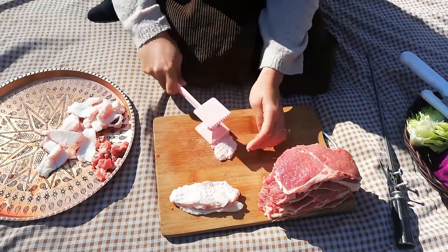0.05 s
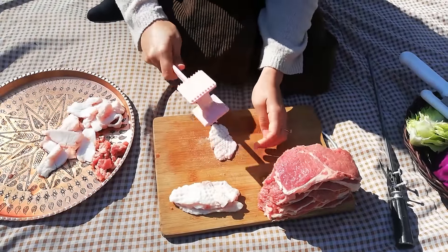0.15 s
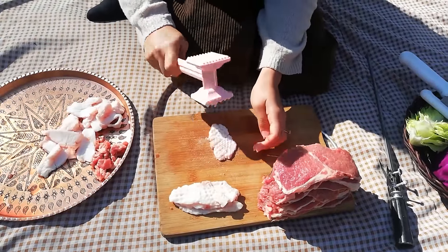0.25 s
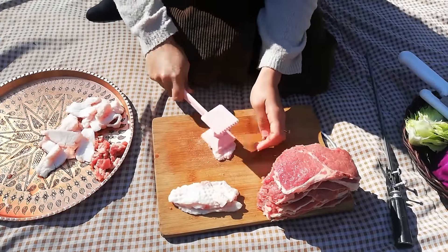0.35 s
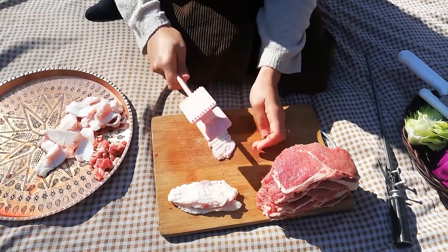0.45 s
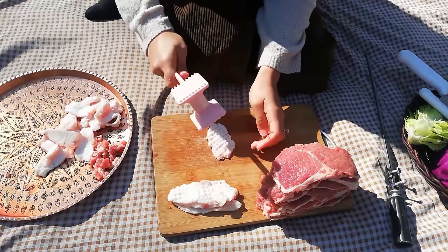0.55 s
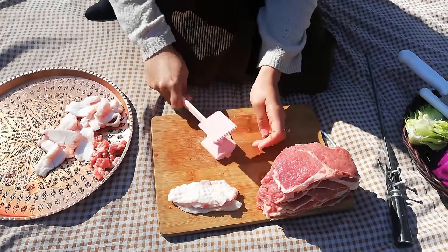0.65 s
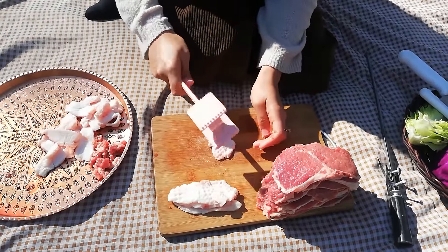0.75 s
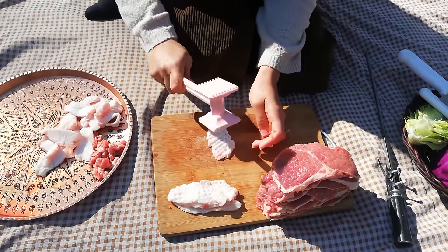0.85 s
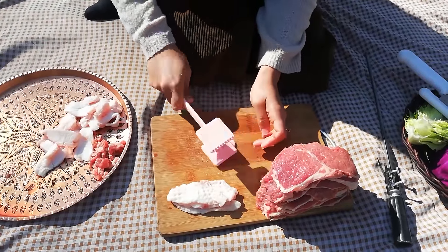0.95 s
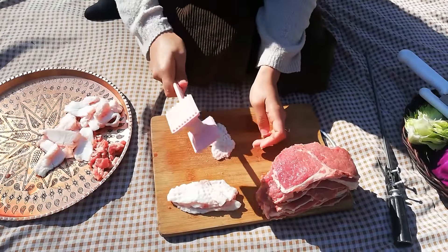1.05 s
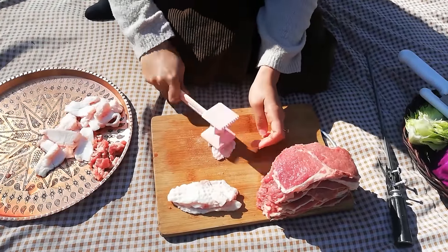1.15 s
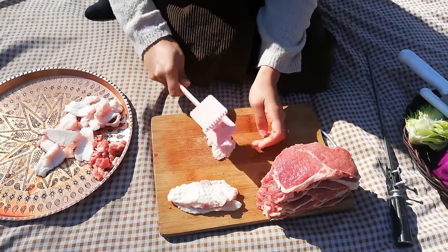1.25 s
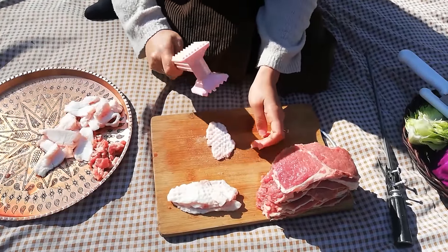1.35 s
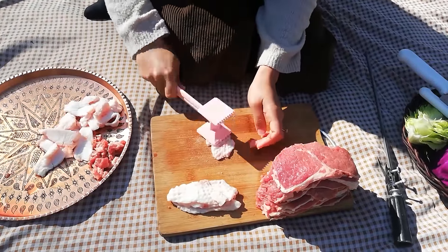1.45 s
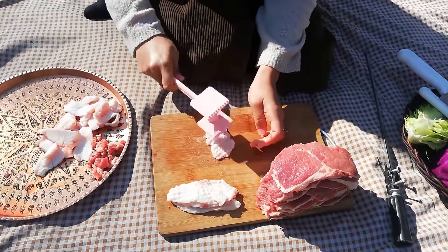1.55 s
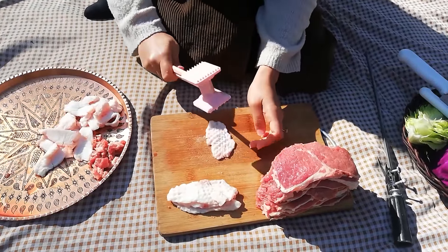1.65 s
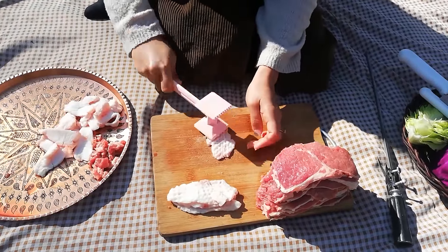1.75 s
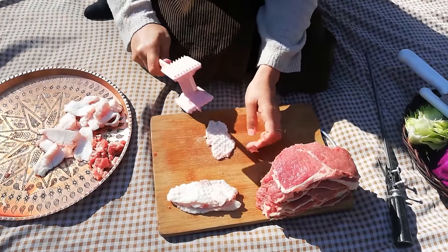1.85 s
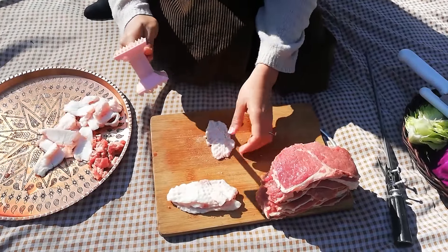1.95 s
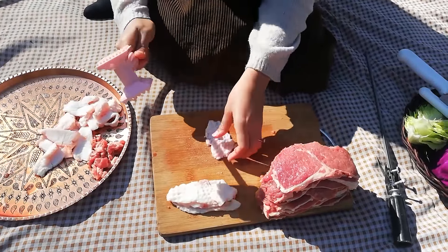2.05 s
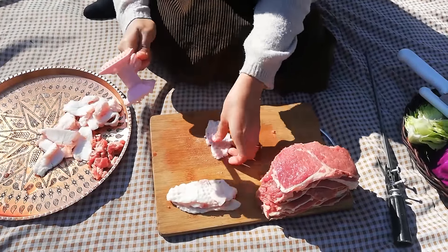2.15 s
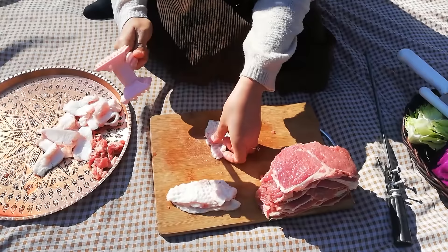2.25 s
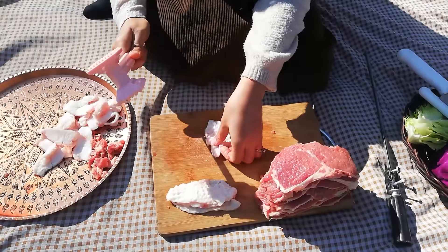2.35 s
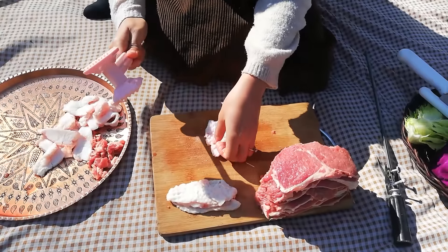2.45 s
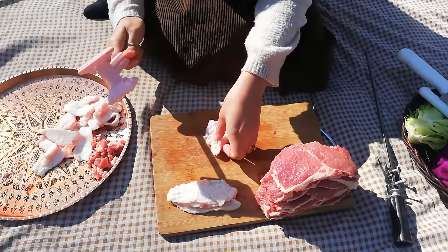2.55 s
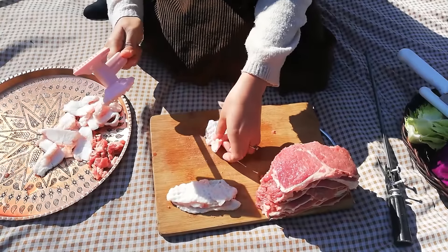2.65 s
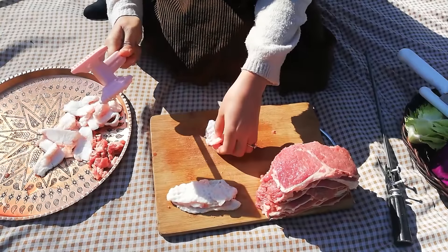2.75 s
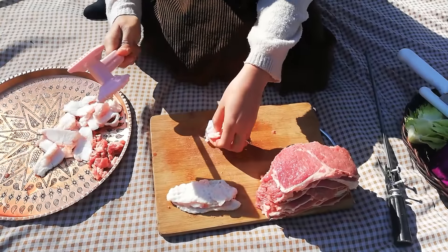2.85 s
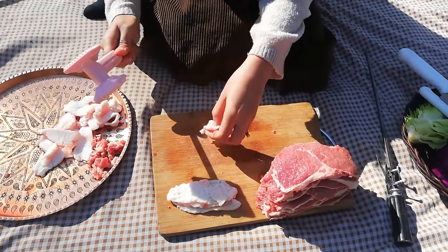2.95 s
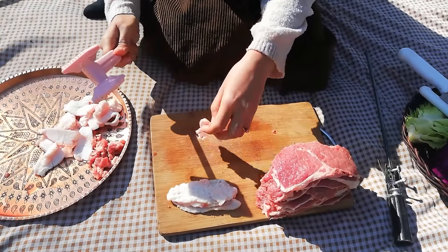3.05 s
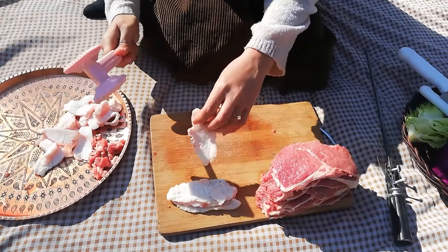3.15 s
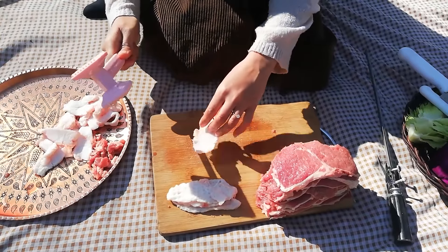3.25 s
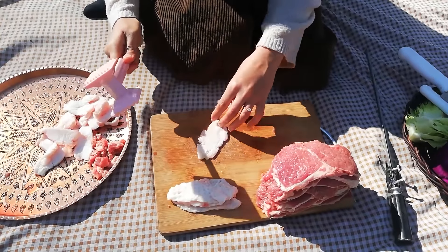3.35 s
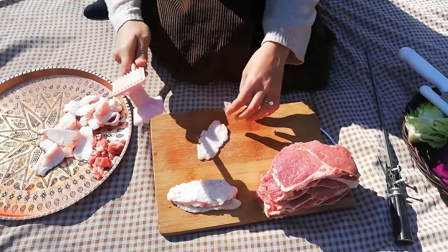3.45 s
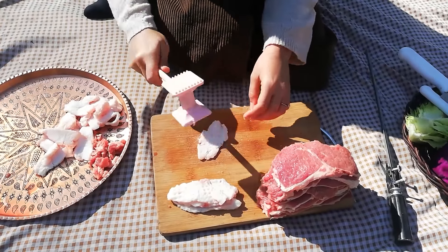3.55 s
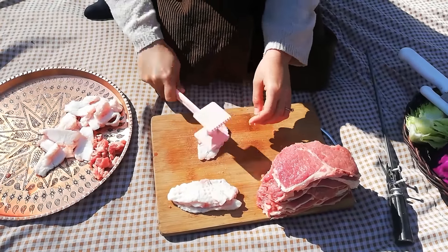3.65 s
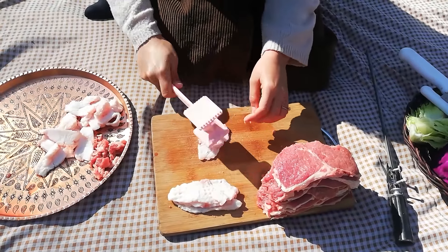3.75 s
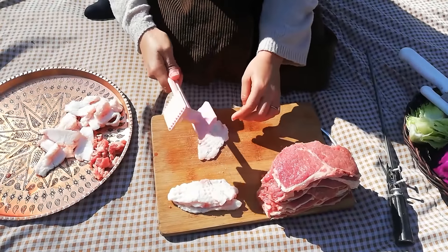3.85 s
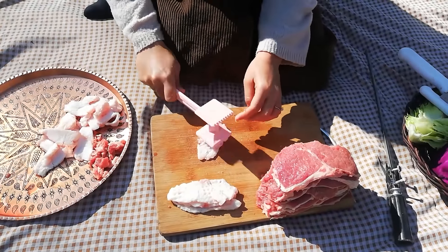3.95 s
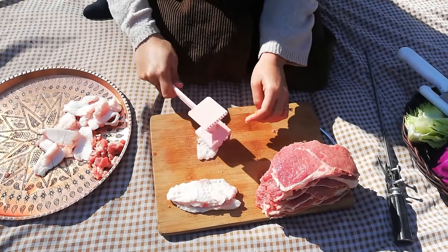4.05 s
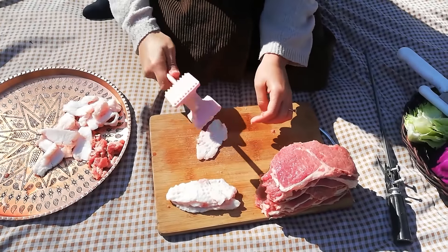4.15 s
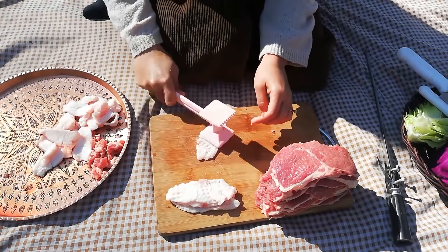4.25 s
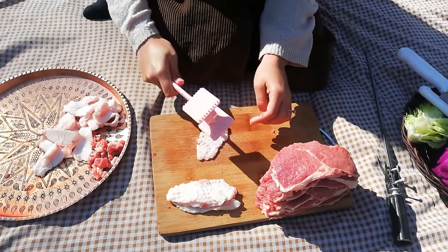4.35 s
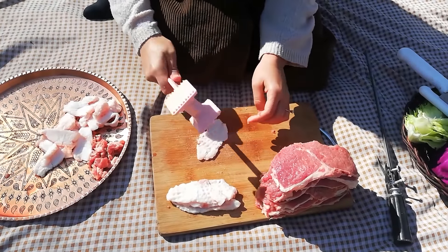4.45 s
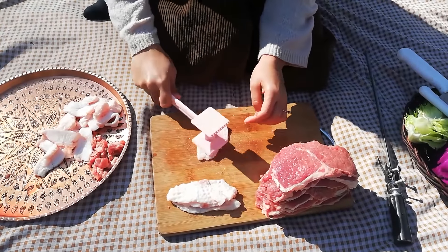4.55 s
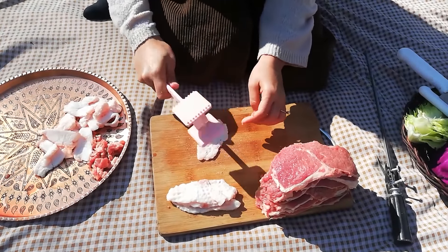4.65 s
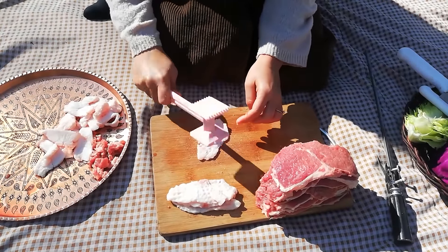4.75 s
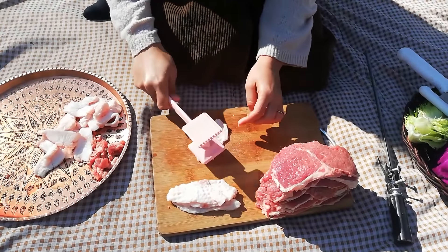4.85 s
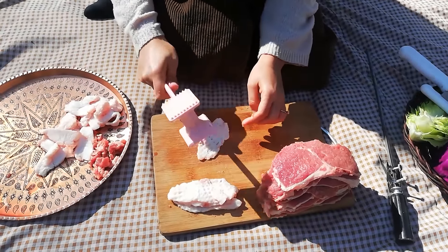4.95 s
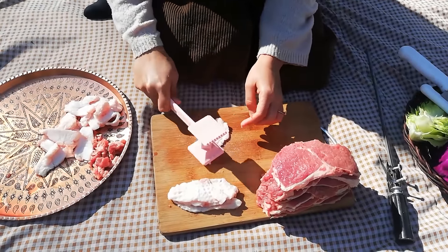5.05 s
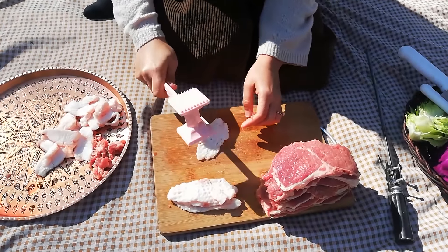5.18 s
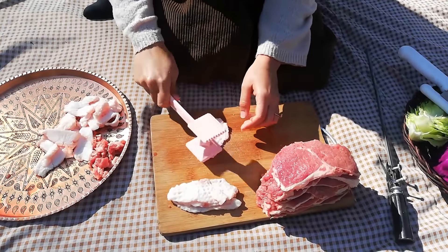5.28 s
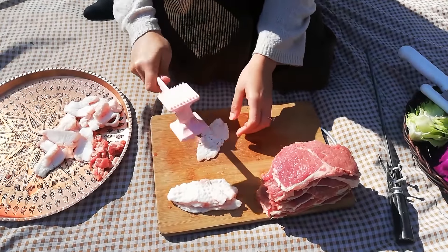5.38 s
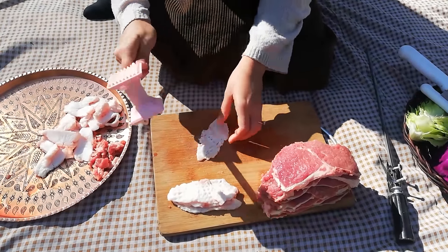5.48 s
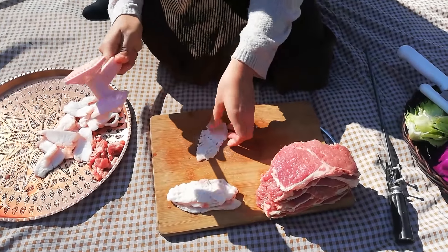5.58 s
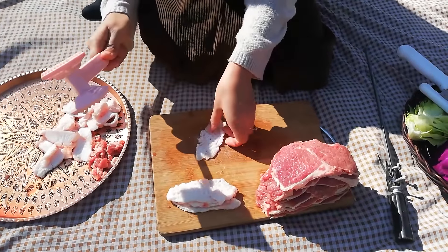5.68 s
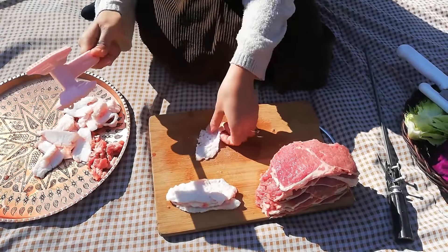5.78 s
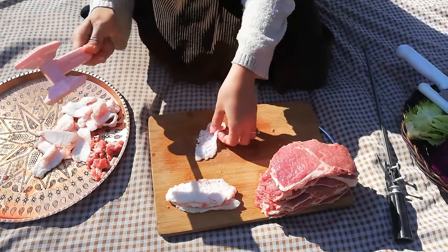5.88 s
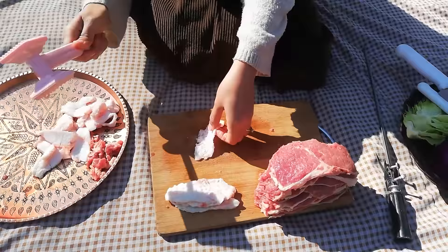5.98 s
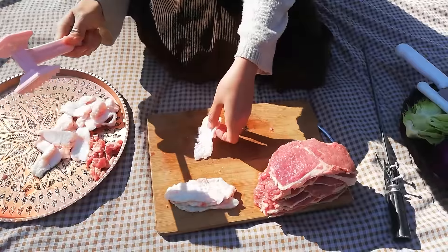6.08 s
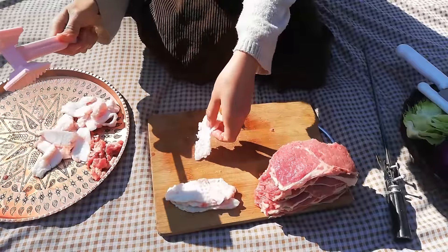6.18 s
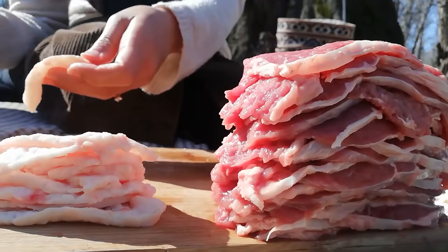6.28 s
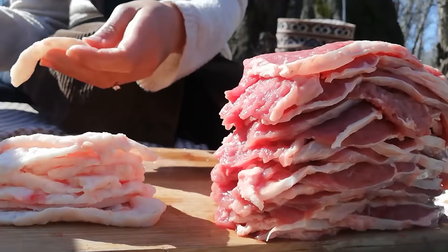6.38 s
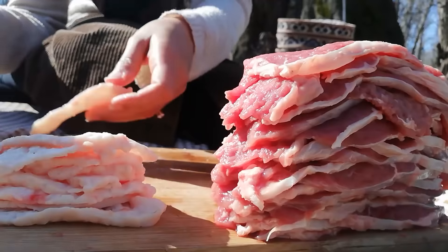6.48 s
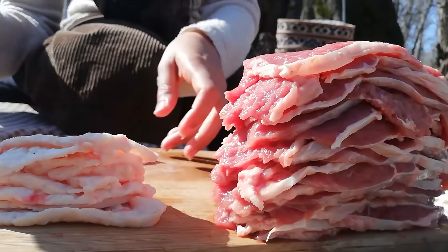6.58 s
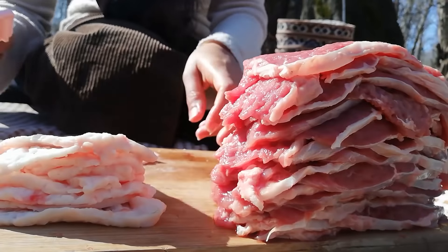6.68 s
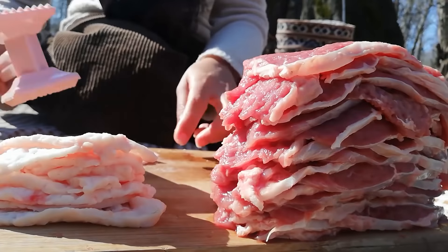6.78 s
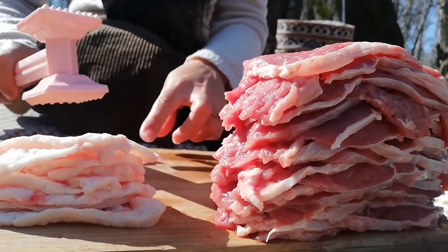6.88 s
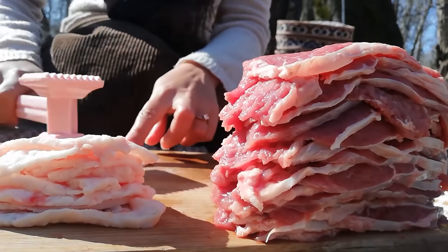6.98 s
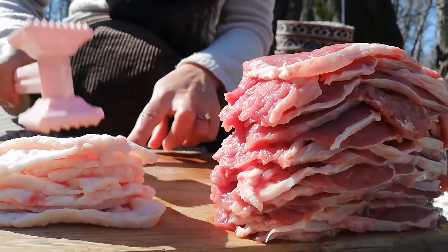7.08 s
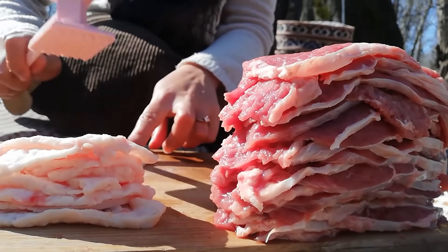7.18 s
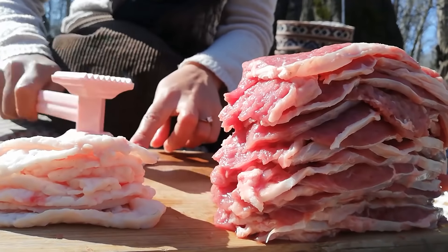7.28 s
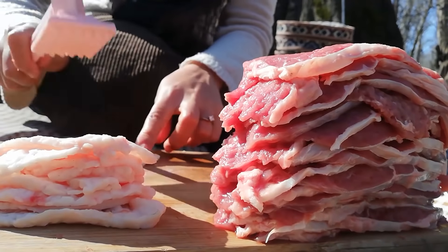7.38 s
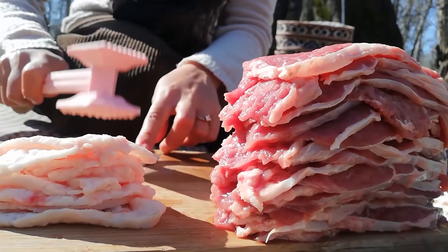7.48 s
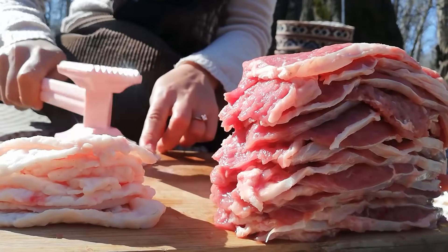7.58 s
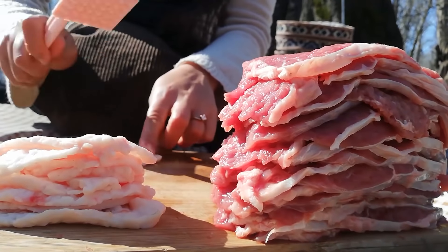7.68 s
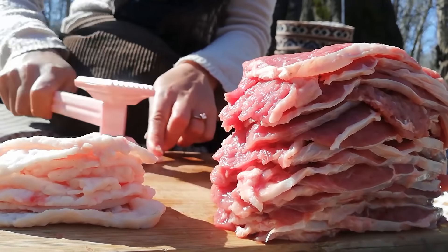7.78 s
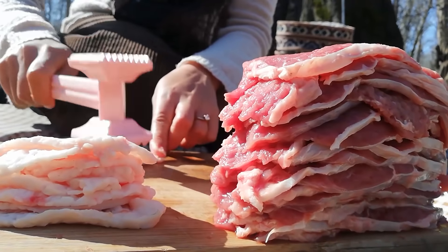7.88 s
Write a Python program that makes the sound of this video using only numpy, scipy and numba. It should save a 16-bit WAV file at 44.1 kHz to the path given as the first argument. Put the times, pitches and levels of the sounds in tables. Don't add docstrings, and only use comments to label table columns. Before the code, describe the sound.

A toothed plastic mallet whacks meat on a small wooden board outdoors, sharp woody knocks with wet crackle, then a few duller thuds.

```python
import sys
import numpy as np
from scipy import signal
from scipy.fft import rfft, irfft
from scipy.io import wavfile
from scipy.ndimage import uniform_filter1d, minimum_filter1d
from numba import njit

SR = 44100
rng = np.random.default_rng(int(sys.argv[2]) if len(sys.argv) > 2 else 0)


def unload_wav(signal):
    wavfile.write(
        sys.argv[1],
        SR,
        np.round(np.clip(np.atleast_2d(signal).T, -1, 1) * 32767).astype(np.int16),
    )


def attenuation_scalar(level_db):
    decades = np.asarray(level_db, float) / 20
    return 10 ** decades


N = 349267


def colour(x, table, causal=1, delay=0):
    hz, db = np.transpose(table)
    grid_hz = np.maximum(np.arange(1025) * SR / 2048, 1)
    log_gain = np.interp(np.log(grid_hz), np.log(hz), db) * np.log(10) / 20
    cepstrum = irfft(log_gain)
    cepstrum[1:1024] *= 1 + causal
    cepstrum[1025:] *= 1 - causal
    response = irfft(np.exp(rfft(cepstrum)))
    return signal.fftconvolve(x, np.roll(response, delay)[:1024])[:len(x)]


def level(x, db):
    return x * attenuation_scalar(db) / np.sqrt(np.mean(x ** 2))


def add(out, x, s):
    i = int(round(s * SR))
    n = min(len(x), len(out) - i)
    out[i:i + n] += x[:n]


def walk(rate):
    k = int(SR / rate)
    steps = np.repeat(rng.standard_normal(N // k + 1), k)
    return 1.3 * uniform_filter1d(uniform_filter1d(steps, k), k)[:N]


# start_s, level_db
WIND_STRENGTH = [(0.0, -62), (0.11, -59.5), (0.6, -60.5), (0.7, -58.5), (2.07, -55), (2.87, -59.5),
                 (3.22, -59), (3.81, -61), (4.28, -58.5), (5.25, -65), (5.53, -57), (6.02, -60),
                 (6.33, -56), (6.77, -57), (7.06, -55), (7.92, -56.5)]


def gusts():
    gust_db = np.interp(np.arange(N) / SR, *np.transpose(WIND_STRENGTH))
    return gust_db - gust_db.mean()


def wind(gust_db):
    out = 0
    for edges_hz, trim_db, follow, wander_db in [((32, 81), -59, 1.1, 2.2), ((68, 170), -61.5, .6, 1.4)]:
        bandpass = signal.butter(2, edges_hz, "bandpass", fs=SR, output="sos")
        band = signal.sosfilt(bandpass, rng.standard_normal(N))
        flutter_db = wander_db * walk(3.8) + 2.5 * walk(21)
        out = out + level(band, trim_db) * attenuation_scalar(follow * gust_db + flutter_db)
    return out


# pitch_hz, level_db
FIELD_COLOUR = [(150, -7.5), (220, -17), (300, -8), (500, -18.5), (800, -18), (1500, -21.5), (3000, -26),
                (6000, -32.5)]


def fields(gust_db):
    murmur = level(colour(rng.standard_normal(N), FIELD_COLOUR), 3.3)
    return murmur * attenuation_scalar(-71.5 + 0.24 * gust_db + 1.8 * walk(13.0))


# pitch_hz, level_db
LEFT_HISS = [(300, -2.5), (1000, 1), (2000, -2), (4500, -3), (6300, -6), (9000, -8), (13000, -11),
             (15800, -11.5), (16100, -42.5)]
RIGHT_HISS = [(300, -4), (1000, 3), (2000, -0.5), (4500, 1), (6300, -3), (9000, 1.5), (10500, -7),
              (12000, -8.5), (15800, -11.5), (16100, -42)]


def hiss(table):
    return level(colour(rng.standard_normal(N), table), -70)


def ring(modes, rise_s, phase, damping=1, early_s=0):
    t = np.arange(8192) / SR - .01 + early_s
    hz, db, t60 = np.transpose(modes)[:, :, None]
    swing_up = np.cos(np.pi / 2 * np.clip(-t / rise_s, 0, 1)) ** 2
    fade = np.exp(-np.log(1000) * np.maximum(t, 0) / (t60 * damping))
    y = swing_up * (attenuation_scalar(db) * np.cos(2 * np.pi * hz * t - phase) * fade).sum(axis=0)
    return y / np.abs(y).max()


# pitch_hz, level_db
SLAP_COLOUR = [(700, -23), (1500, -7.5), (2500, -3), (3800, 0), (5000, -3), (7000, -1.5), (10500, -3.5),
               (13000, -6.5), (16000, -22)]


def slap(t, squash_s, slap_s):
    grow = np.clip(2 * (t / squash_s + 1), 0, 1) ** 2
    die = np.exp(-np.maximum(t + squash_s / 2, 0) / slap_s)
    crackle = rng.standard_normal(len(t)) * attenuation_scalar(3.7 * rng.standard_normal(len(t)))
    y = colour(crackle * grow * die, SLAP_COLOUR)
    return y / np.abs(y).max()


GROUP_TRIM = [-0.5, -1.5, 2, -14.5]
RISE_TIME = [0.69, .8, 0.89]
TOP_LAG = [0.63, 0.093, 3.4]
# wetness_db (crack minus half the knock), share of the free board t60 (0-1)
MEAT_DAMPING = [(-16, 0.86), (-2.5, 0.28)]


def blows(table, groups, free_t60_s, squash_soft_s, squash_hard_s, slap_s, knock_early_s):
    out = np.zeros(N)
    t = np.arange(8192) / SR - .01
    for s, thud_db, board_db, knock_db, crack_db in table:
        board_t60 = free_t60_s * np.interp(crack_db - knock_db / 2, *np.transpose(MEAT_DAMPING))
        softness = np.interp(knock_db - thud_db, [-20, 8], [1, 0])
        squash_s = squash_hard_s + softness * (squash_soft_s - squash_hard_s)
        spot = [np.array(g, float) for g in groups]
        for modes, spread, spread_db in zip(spot, [.01, .012, .015, .004], [0, 1.5, 2.5, 3.5]):
            modes[:, 0] *= 1 + spread * rng.standard_normal(len(modes))
            modes[:, 1] += spread_db * rng.standard_normal(len(modes))
        high = spot[2][:, 0] > 2000
        spot[2][high, 1] += 1.2 * (1 - softness) * np.clip(knock_db - board_db, -10, 3)
        rise_s = [cycles / g[0][0] for cycles, g in zip(RISE_TIME, groups)]
        board_rise_s = rise_s[1] * (1 + 0.99 * softness)
        thud = ring(spot[0], rise_s[0], TOP_LAG[0])
        board = ring(spot[1], board_rise_s, TOP_LAG[1], board_t60)
        knock = ring(spot[2], rise_s[2], TOP_LAG[2], early_s=knock_early_s)
        head = ring(spot[3], .0006, 2 * np.pi * rng.random((len(groups[3]), 1)))
        hit = attenuation_scalar(thud_db + GROUP_TRIM[0]) * thud
        hit = hit + attenuation_scalar(board_db + GROUP_TRIM[1]) * board
        hit = hit + attenuation_scalar(knock_db + GROUP_TRIM[2]) * knock
        hit = hit + attenuation_scalar(crack_db) * slap(t, squash_s, slap_s)
        hit = hit + attenuation_scalar(knock_db + GROUP_TRIM[3] - 8.5 * softness) * head
        add(out, hit, s - .01)
    return signal.sosfilt(signal.butter(3, 95, "highpass", fs=SR, output="sos"), out)


# pitch_hz, width_hz, share removed (0-1)
QUIET_PITCHES = [
    (406.5, 57, 0.7),
    (822, 84, 0.7),
    (1320, 47, .4),
    (2760, 500, 0.2),
]


def cancel(x):
    for hz, width_hz, share in QUIET_PITCHES:
        x = x - min(share, 1) * signal.lfilter(*signal.iirpeak(hz, hz / width_hz, fs=SR), x)
    return x


# start_s, thud_db, board_db, knock_db, wet_crack_db
BLOWS_FROM_ABOVE = [(0.0558, -10.5, -11, -20, -23.5), (0.3705, -14, 3.5, -3.5, -13.5),
                    (0.6527, -10.5, -4, -30, -31), (0.9352, -18, 5.5, -3, -14.5),
                    (1.2118, -11, -5, -22.5, -26.5), (1.4976, -10.5, -7.5, -28.5, -24.5),
                    (1.7676, -14.5, 2, -11.5, -8), (3.6872, -12, 2, -8, -12.5),
                    (3.9936, -14.5, -38, -43, -38), (4.2683, -8.5, -10, -32.5, -33.5),
                    (4.5501, -11, -10.5, -14.5, -35.5), (4.8029, -9.5, 7, 6, -13.5),
                    (5.0496, -16.5, 6, 6.5, -10.5), (5.3124, -22, -4.5, -11.5, -36)]
# pitch_hz, level_db, t60_s (for the board a share of the blow's t60)
PARTS_FROM_ABOVE = [
    [(257, -0.5, 0.015), (228.5, -19, 0.11)],
    [(609.2, 8.5, 0.59), (682.4, -19.5, 1.4), (567, -13.5, 1.9)],
    [(1130, 1, 0.017), (1575, 4, 0.012), (892.5, -10, .012), (2140, -15, .018), (2390, -15.5, 0.027),
     (1239, -26, 0.079)],
    [(3592, -4.5, 0.012), (4678, -6.5, 0.01), (5430, -11, 0.017), (6250, -5.5, 0.02), (8450, -23.5, 0.0038),
     (10000, -18, 0.018), (12206, -22.5, 0.011)],
]


def blows_from_above():
    hits = blows(BLOWS_FROM_ABOVE, PARTS_FROM_ABOVE, free_t60_s=0.061, squash_soft_s=0.0035,
                 squash_hard_s=0.0015, slap_s=0.002, knock_early_s=0.00049)
    return cancel(hits)


# pitch_hz, level_db
TREE_COLOUR = [(250, -5.5), (420, 6), (590, -4.5), (1000, -7), (1370, 4.5), (1700, -11), (2500, 3.5),
               (3100, -12.5), (6000, -41.5)]
# delay_s, level_db
TREE_TRUNKS = [(.03, 7), (.057, 4.5), (.075, 2.2), (.103, 0), (.16, 1.8)]


def trees(x, t60_s, wet_db):
    t = np.arange(int(.7 * SR)) / SR
    trunks = sum(attenuation_scalar(db) * np.exp(-((t - s) / .004) ** 2) for s, db in TREE_TRUNKS)
    shape = np.minimum(t / 0.005, 1) + trunks
    shape = shape / (1 + (t / 0.23) ** 4)
    wash = level(colour(rng.standard_normal(len(t)), TREE_COLOUR), wet_db)
    echo = wash * shape * np.exp(-np.log(1000) * t / t60_s)
    return signal.fftconvolve(x, echo)[:N] * attenuation_scalar(1.2 * walk(240))


def clicks(events):
    out = np.zeros(N)
    t = np.arange(60) / SR
    for s, peak_db in events:
        burst = (t == 0) + 0.15 * rng.standard_normal(len(t)) * np.exp(-t / .0003)
        add(out, burst * attenuation_scalar(peak_db + 1.2 * rng.standard_normal()), s - .0002)
    return colour(out, [(3000, -28.5), (5500, -2.5), (7500, 6.5), (10000, 5), (12500, -11.0), (16000, -14)])


# start_s, length_s, level_db
UNSTICKING = [
    (.078, .012, -47),
    (.304, 0.013, -40.5),
    (.776, 0.029, -39.5),
    (1.236, 0.044, -36),
    (1.716, 0.01916, -40),
    (7.53, 0.0078, -38.5),
]


def peels():
    return clicks([(s + length_s * share, db) for s, length_s, db in UNSTICKING for share in (0, .8, 1)])


# start_s, thud_db, board_db, knock_db, wet_crack_db
LIGHT_TOUCHES = [(.8035, -57, -66, -75, -45.5), (1.259, -70, -63, -58, -50), (3.32, -59, -48, -60, -67.5),
                 (3.857, -52, -55, -51.5, -45), (6.208, -51, -64, -61, -74), (6.318, -56, -57, -73, -79.5),
                 (6.052, -56.5, -54, -56.5, -74), (6.353, -48, -50.5, -73, -76),
                 (6.568, -57, -32.5, -46, -52), (7.868, -45, -43.5, -71, -66), (.668, -39, -35, -45, -54),
                 (1.226, -50, -40, -37, -54), (1.523, -49.5, -41, -49.5, -58), (1.8, -58, -48, -59.5, -46),
                 (7.679, -63.5, -65, -61, -50.5)]


def touches():
    return blows(LIGHT_TOUCHES, PARTS_FROM_ABOVE, free_t60_s=0.033, squash_soft_s=0.00103,
                 squash_hard_s=0.00057, slap_s=.001, knock_early_s=0.00029)


# start_s, length_s, pitch_hz, level_db
RUBBING = [
    (3.865, .075, 3500, -66),
    (6.445, .04, 3400, -72),
    (.81, .03, 7500, -68),
    (1.26, .02, 8000, -64),
]


def rubs():
    out = np.zeros(N)
    for s, length_s, hz, db in RUBBING:
        n = int(length_s * SR)
        grains = rng.standard_normal(n) * attenuation_scalar(1.5 * rng.standard_normal(n)) * np.exp(-1.5 * np.arange(n) / n)
        band = [(hz * .45, -20), (hz * 0.88, 0), (hz * 1.0, 0), (hz * 1.9, -20)]
        add(out, level(colour(grains, band), db), s)
    return out


# centre_s, length_s, pitch_hz, peak_db
WIND_EDDIES = [(0.898, 0.047, 65.6, -40.5), (1.28, 0.058, 54.5, -39), (1.349, 0.041, 62, -41.5),
               (1.578, 0.035, 65, -44), (1.971, 0.053, 50, -42), (2.037, .06, 62, -44.5),
               (2.194, .06, 55.5, -45), (4.38, 0.06, 69.7, -49), (6.891, 0.037, 51.7, -39),
               (7.08, 0.063, 34.9, -44)]


def eddies():
    out = np.zeros(N)
    for s, length_s, hz, db in WIND_EDDIES:
        t = np.arange(int(length_s * SR)) / SR
        swing = np.sin(2 * np.pi * (hz * t + rng.random()))
        add(out, attenuation_scalar(db) * np.sin(np.pi * t / length_s) * swing, s - length_s / 2)
    return out


# first_tick_s, count of cycles, lead_s (how early the lead tick comes)
CLOCK_SPELLS = [(1.9703, 5, .0247), (2.4503, 3, .0247), (2.6503, 6, .0247), (3.2103, 3, .0247),
                (3.5303, 1, .0247), (3.8503, 8, .0177), (4.5703, 4, .0217), (4.9303, 1, .0217),
                (4.9703, 3, .0217), (5.4903, 1, .0217), (5.6503, 5, .0217), (6.0903, 2, .0357),
                (6.4103, 7, .0267), (7.0503, 3, .0267), (7.4503, 1, .0087), (7.6503, 1, .0157),
                (7.7703, 1, .0357), (7.8503, 1, .0267)]
CLOCK_PATTERN = [-.0087, -.007, 0, .0043, .04]


def clock_ticks(db):
    events = []
    for first_s, count, lead_s in CLOCK_SPELLS:
        for k in range(int(count)):
            events += [(first_s + k * .08 + offset_s, db) for offset_s in [-lead_s, *CLOCK_PATTERN]]
    return clicks(events)


# start_s, length_s, pitch_hz, level_db
BIRD_NOTES = [
    (6.21, .05, 4380, -76),
    (6.31, .11, 4390, -77),
    (6.55, .04, 4370, -78),
    (6.65, .21, 4360, -76),
    (7.16, .07, 4420, -76),
    (7.28, .05, 4410, -77),
]


def bird():
    out = np.zeros(N)
    waver = walk(40)
    for s, length_s, hz, db in BIRD_NOTES:
        n = int(length_s * SR)
        wobble = waver[int(s * SR):int(s * SR) + n]
        turns = np.cumsum(hz * (1 + 0.004 * wobble)) / SR
        note = np.sin(2 * np.pi * turns) * attenuation_scalar(3 * wobble - 3)
        add(out, attenuation_scalar(db) * note * signal.windows.tukey(n, .4), s)
    return out


# start_s, thud_db, board_db, knock_db, wet_crack_db
BLOWS_AT_BOARD = [
    (6.9896, -20.5, -26.5, -43, -34.5),
    (7.0022, -61, -18.5, -39.5, -44),
    (7.252, -16.5, -17, -24, -20.5),
    (7.5114, -15, -12, -25, -23),
    (7.7876, -18, -14.5, -20, -23.5),
]
# pitch_hz, level_db, t60_s (for the board a share of the blow's t60)
PARTS_AT_BOARD = [
    [(170.4, 1.5, 0.019), (222.4, -14, 0.11)],
    [(418, 12.5, 1), (720, 6.5, 0.4)],
    [(1448, 9, 0.017), (1170, -13, 0.029), (2240, -18, 0.0079)],
    [(3430, -17, 0.017), (4160, 3, 0.018), (5040, -28, .015), (9840, -18, 0.013)],
]


def blows_at_board_height():
    return blows(BLOWS_AT_BOARD, PARTS_AT_BOARD, free_t60_s=0.024, squash_soft_s=0.00334,
                 squash_hard_s=0.0028, slap_s=.002, knock_early_s=0.00226)


# pitch_hz, level_db
BODY_SHADOW = [(40, .1), (160, 1.3), (300, -.3), (500, -6), (700, -11), (1000, -15.5), (1600, -10),
               (3000, -17), (5000, -24), (12000, -30)]


def behind_camera(air):
    return colour(air, BODY_SHADOW, causal=.35, delay=26)


def scene():
    gust_db = gusts()
    above = blows_from_above()
    low = blows_at_board_height()
    air = above + low + touches()
    air = air + trees(above, t60_s=2.3, wet_db=-83.0) + trees(low, t60_s=.19, wet_db=-69)
    air = air + wind(gust_db) + eddies() + fields(gust_db) + rubs() + bird()
    left = behind_camera(air) + attenuation_scalar(-21) * wind(gust_db) + hiss(LEFT_HISS)
    right = air + hiss(RIGHT_HISS) + peels() + clock_ticks(-41.5)
    return np.array([left, right])


@njit
def recover(need, step):
    out, g = np.empty(len(need)), 0.
    for i in range(len(need)):
        g = min(need[i], g * step)
        out[i] = g
    return out


def low_pass(x):
    return signal.sosfilt(signal.butter(12, 16570, fs=SR, output="sos"), x)


def record(dry):
    need_db = np.minimum(0, -20 * np.log10(np.abs(dry).max(axis=0) / 1.1 + 1e-9))
    ahead_db = minimum_filter1d(need_db, size=133)
    gain_db = recover(ahead_db, np.exp(-1 / (.08 * SR)))
    held = dry * attenuation_scalar(uniform_filter1d(gain_db, size=66))
    rounded = 1.04 * held / (1 + held ** 8) ** (1 / 8)
    cut = signal.sosfilt(signal.ellip(10, .2, 75, 16200, fs=SR, output="sos"), rounded)
    return low_pass(cut)


dry = scene()
out = record(dry)
unload_wav(out)
```